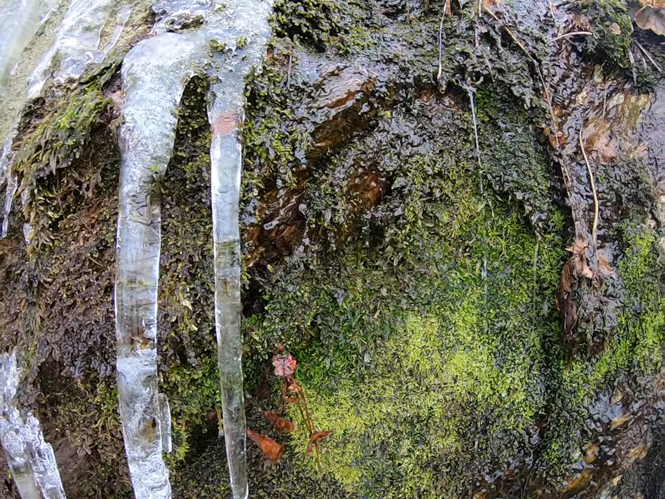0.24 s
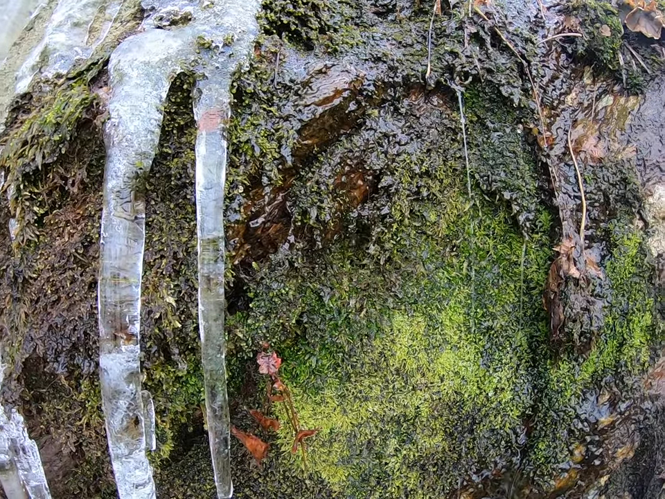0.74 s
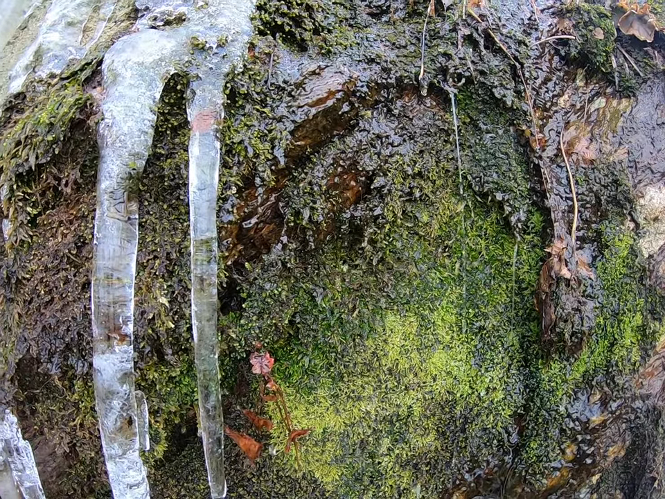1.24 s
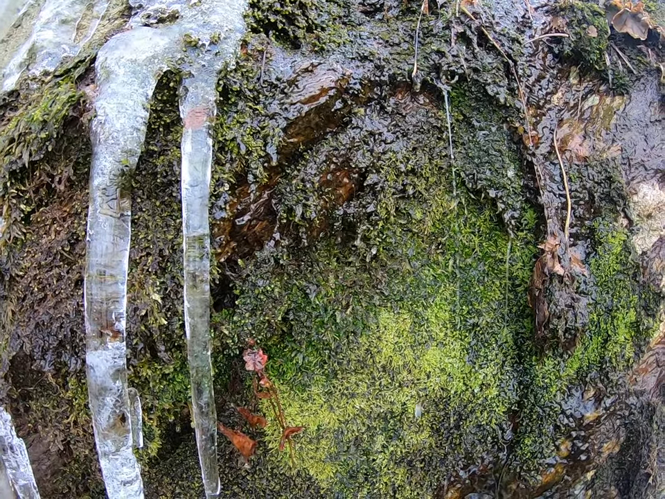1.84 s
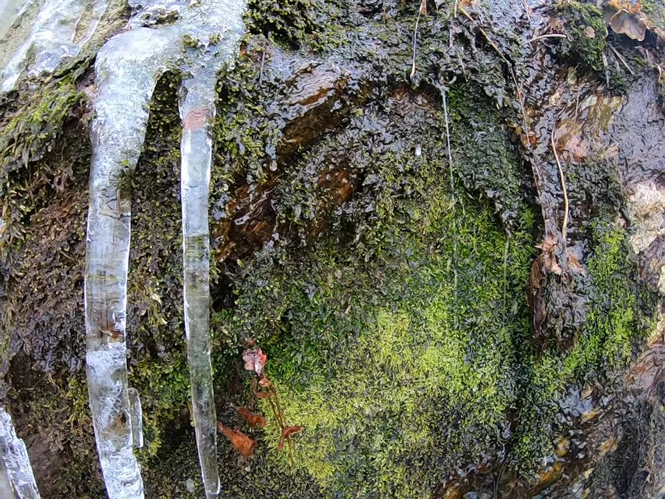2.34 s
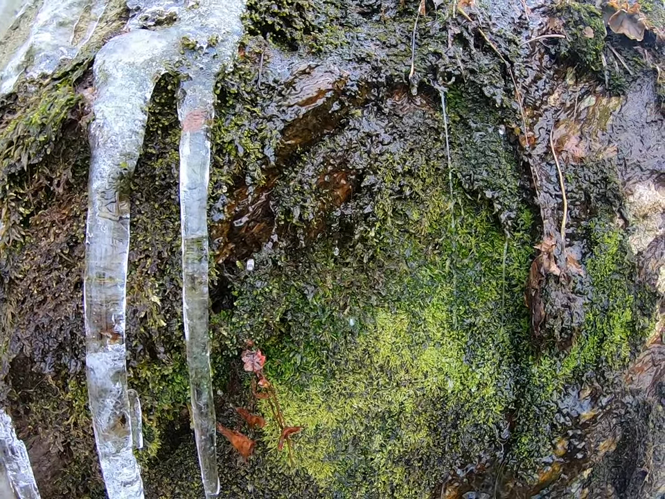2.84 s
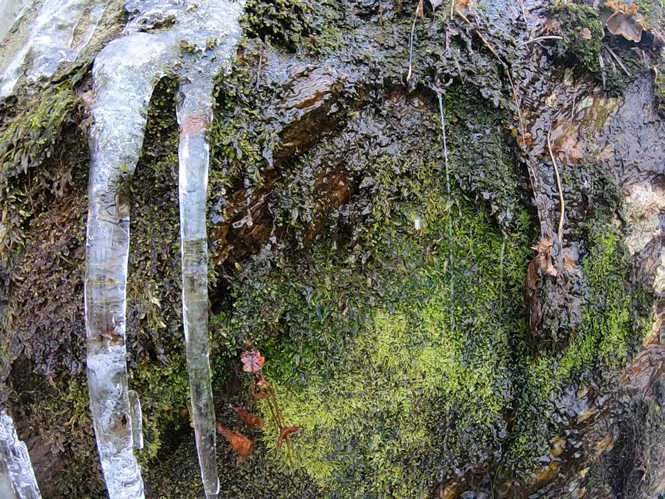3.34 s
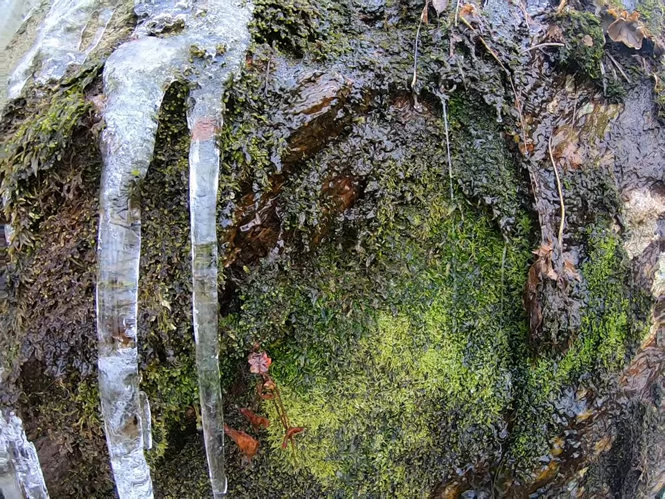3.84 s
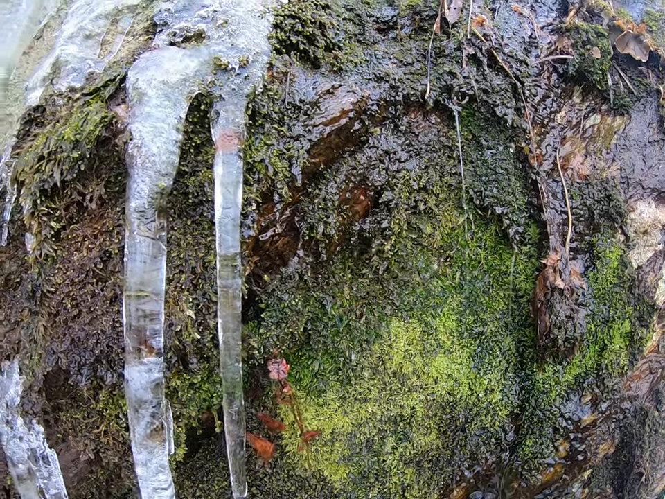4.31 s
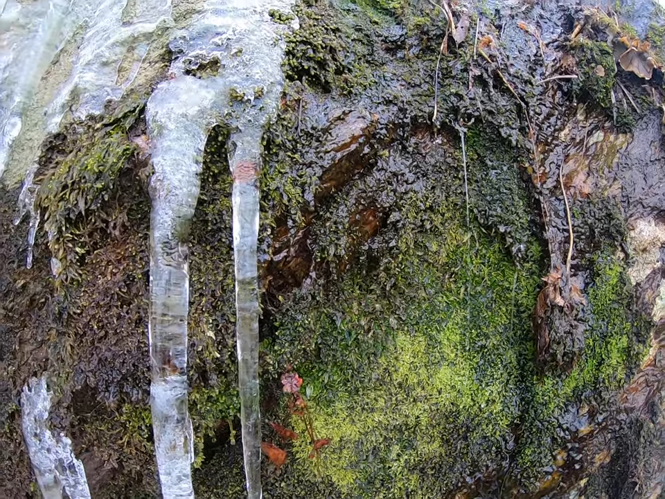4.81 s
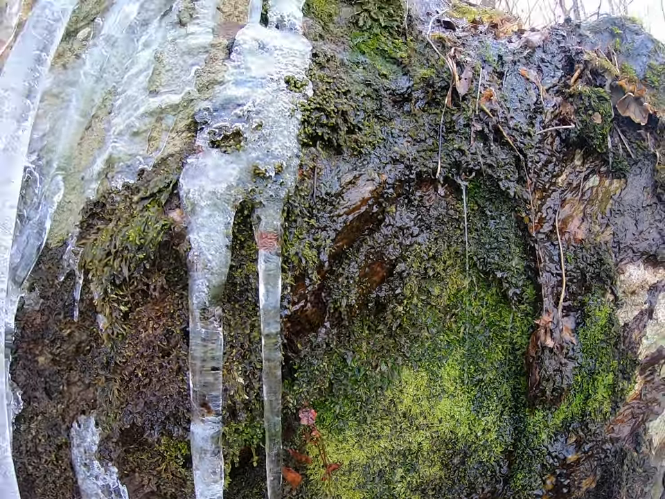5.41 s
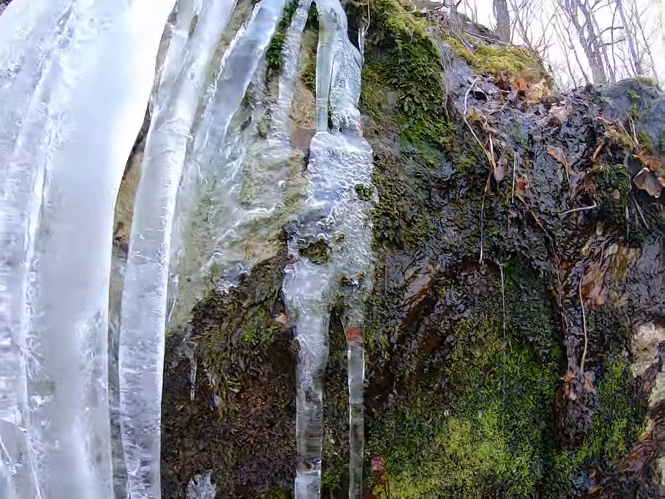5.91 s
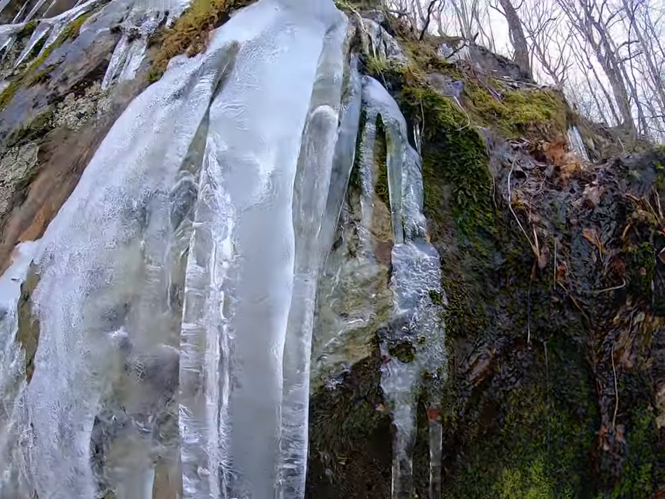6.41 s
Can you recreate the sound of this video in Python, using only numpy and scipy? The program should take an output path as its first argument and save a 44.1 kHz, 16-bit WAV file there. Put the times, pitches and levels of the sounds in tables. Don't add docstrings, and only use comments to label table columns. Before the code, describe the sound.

Meltwater patters in bright, crisp splats on wet rock and moss, with heavy drops plunking hollowly at intervals over a faint low engine hum.

```python
import sys
import numpy as np
from scipy import signal
from scipy.fft import rfft, irfft
from scipy.io import wavfile
from scipy.ndimage import uniform_filter1d

SR = 44100
rng = np.random.default_rng(int(sys.argv[2]) if len(sys.argv) > 2 else 0)


def undo_db(level):
    steps = np.asarray(level, float) / 20
    return 10 ** steps


def unload_audio(sound):
    columns = np.transpose(np.atleast_2d(sound))
    steps = np.round(np.clip(columns, -1, 1) * 32767)
    wavfile.write(sys.argv[1], SR, steps.astype(np.int16))


N = 293441

# start in seconds, peak at the right port in dB, pitch in Hz, left minus right in dB.
SPLATS = [(0.017, -41.6, 7100, -14.0), (0.1114, -41.9, 6900, -19.0), (0.1362, -42, 8610.0, -12.0),
          (0.6203, -36.5, 6240, -21.0), (0.7367, -34, 7170.0, -16), (1.0736, -42.5, 7190.0, -19.0),
          (1.08, -34.5, 7300, -13), (1.1304, -42, 6640, -18.0), (1.5465, -41.5, 8300, -14),
          (1.987, -38, 6540, -18.0), (2.0254, -38.7, 7530, -17), (2.3375, -39.5, 7500, -19.0),
          (2.855, -35.5, 6650, -24), (2.8865, -40.5, 8300, -12), (3.2164, -31.5, 6480.0, -24.0),
          (3.367, -38.5, 7900, -14), (3.5703, -35.5, 8000, -18), (3.6304, -36, 8600, -21),
          (3.7732, -36.5, 6350, -6), (3.8458, -43, 6610.0, -17), (3.966, -38.5, 6120.0, -18.0),
          (4.1712, -37.5, 8300, -15), (4.27, -39, 5060, -12), (4.4152, -39.5, 8160, -8),
          (5.0342, -39.5, 7450, -20), (5.0946, -41.5, 7100, -23), (5.175, -35, 8000, -5),
          (5.498, -42.7, 6940, -22), (5.8404, -40.5, 7900, -15.0), (6.0707, -37, 7100, -28)]
# start in seconds, peak in dB, pitch in Hz.
MOSS_SPLATS = [(0.1452, -46, 6050.0), (0.197, -47, 7000), (0.3973, -45, 5700), (0.4397, -41.5, 5570),
               (0.6823, -48.1, 6800), (0.867, -44.5, 6060.0), (1.1454, -39.5, 7200), (1.282, -45, 6630),
               (1.3788, -40.5, 5170), (1.526, -44.5, 7000), (1.749, -46, 7600), (2.0778, -44.4, 6460),
               (2.1444, -45, 4800), (2.1758, -47, 5000), (2.3551, -41.5, 6850), (2.5247, -49, 7200),
               (2.652, -42, 7400), (2.9927, -41.5, 6400), (3.1676, -43, 7000.0), (3.3613, -43, 6850),
               (3.5994, -45, 6700), (4.263, -53, 6680.0), (4.8605, -42, 5900), (4.907, -40.5, 5820),
               (5.2092, -45.5, 4740), (5.3604, -48, 7100), (5.7559, -44, 6800), (6.1849, -45.5, 6590.0),
               (6.3133, -50, 6620.0), (6.4588, -39.5, 6900)]
# start in seconds, peak in dB, pitch in Hz.
ICE_SPLATS = [(0.0747, -43.5, 8270.0), (0.119, -45.2, 7300.0), (0.1275, -53, 8150), (0.217, -46, 8630.0),
              (0.2536, -41.5, 7200), (0.485, -41, 7500), (0.536, -48, 8700), (1.24, -43.5, 7160.0),
              (1.3442, -42.5, 8350), (1.5799, -47.5, 7450.0), (1.7179, -38.5, 8170.0), (1.873, -45.5, 7660),
              (2.5727, -44.1, 7350), (2.6794, -45, 8300), (2.9747, -40.5, 9200), (3.0154, -42, 7480.0),
              (3.206, -45, 7840), (3.29, -44, 8400), (3.9236, -44.5, 7900), (4.2444, -48, 7370.0),
              (4.9732, -40.5, 8800), (5.315, -45.5, 7990.0), (5.3493, -44, 7750.0), (5.5235, -41.5, 7350.0),
              (5.8253, -48, 7700), (5.858, -44.5, 7710.0), (5.8824, -47.5, 7700), (6.121, -45.5, 8300),
              (6.174, -42, 7500), (6.5879, -43.5, 7300.0)]
# start in seconds, peak in dB.
SPECKS = [(0.2353, -53), (0.4558, -58), (0.8608, -47), (0.9891, -46.5), (1.6216, -50), (2.3729, -48.3),
          (2.5959, -48), (2.8698, -61), (3.0858, -44), (3.1177, -56), (3.1481, -51), (3.1871, -50),
          (3.4559, -46), (3.5158, -46.5), (3.6859, -52), (3.7583, -54), (4.1559, -45), (4.2382, -46),
          (4.3704, -42), (4.3773, -47.5), (4.4956, -46), (4.5559, -47), (4.6802, -46.5), (4.9495, -48),
          (4.993, -52), (5.2354, -48), (5.5307, -52), (5.5796, -45), (6.1623, -51), (6.4841, -47)]
# first drip in seconds, period in seconds, slowing in seconds per second squared, last drip in seconds.
TIPS = [
    (.0395, .16822, .00046, 6.63),
    (.0016, .50332, .00032, 6.63),
    (.3860, .6343, -.00073, 5.9),
]
# peak in dB, growth in dB per second, pitch in Hz.
TIP_VOICES = [
    (-47, 0.64, 7100),
    (-46, -1, 6450),
    (-42, -3.6, 7250),
]
# peak in dB, first ring in Hz, second ring in Hz, first
# ring over peak in dB, second ring over peak in dB.
DROPS = [
    (-36, 1120, 680, 11, 1.5),
    (-26, 1040, 1400, 4.5, -18),
    (-29, 1110, 1620, -4, -1),
    (-25, 1105, 1630, -1, -0.5),
    (-25.5, 1110, 1380, -9.5, -5),
    (-28, 1090, 780, 3.5, -10),
    (-25, 1030, 1450, -5, -6.5),
]
# start in seconds, peak in dB, centre in Hz, left minus right in dB.
PLOPS = [(0.6212, -50, 3550, -1), (1.117, -51, 4300, -8), (1.1304, -48, 4700, -13), (4.294, -52, 4040, -8),
         (2.5247, -54.5, 3400, -4.0), (2.8555, -47, 3550, -5), (2.995, -49.5, 3700, -3),
         (4.5902, -49.5, 2800, -3), (5.0966, -45.5, 3800, -7), (5.7158, -46.5, 3430, -8),
         (6.1203, -53, 3700, 3.0), (6.1714, -52.5, 3680, -7)]
# start in seconds, peak in dB, centre in Hz, left minus right in dB.
AFTER_DROPS = [
    (2.98, -54, 1150, -1.0),
    (3.718, -54, 920, -2.5),
]
# centre in Hz, width in Hz, lift in dB.
PORTS = [
    (9600, 1800, 8),
    (7230, 4400, 7),
]
# multiple of the firing cycle, level in dB.
ENGINE_ORDERS = [(5, -65.3), (6, -62.0), (7, -64.9), (8, -48.6), (9, -71.2), (10, -61.3), (11, -49.5),
                 (12, -59.9), (13, -37.8), (14, -63.2), (15, -48.5), (16, -49.5), (17, -54.3), (18, -65.3),
                 (19, -57.6), (20, -72.5), (21, -55.9), (22, -70.9), (23, -71.3), (24, -70.6), (25, -69.5),
                 (27, -72.5), (29, -72.1), (31, -69.7)]
# centre in seconds, lift over the breeze in dB.
PUFFS = [
    (0.0, 8),
    (.13, 0),
    (.37, 3),
    (6.0, 6),
    (6.2, 3),
    (6.39, 2),
]
# frequency in Hz, left level in dB per Hz, right level in dB per Hz.
AIR = [(24.2, -104, -65), (44, -80.5, -70.5), (102.2, -66, -60), (215.4, -78.5, -78), (292, -96.5, -97),
       (466, -94, -99), (753, -86.5, -88.5), (965, -94.5, -93.5), (2050, -99.3, -99.1),
       (4520, -105.1, -106.8), (7300, -108.3, -107.5), (7900, -110.0, -107.9), (10300, -121.2, -116.0),
       (15700, -145, -133)]
# frequency in Hz, left-right correlation.
LIKENESS = [(40, 0.04), (130, 0.97), (290, -0.34), (640, -0.9), (1410, -0.41), (4000, 0.15)]


def patter():
    s, db, hz, left_db = drips()
    right = splash(s, db, hz, count=7, spread_s=0.0025, fade_db=9.5, scatter=0.23)
    left = splash(s + 0.00093, db + left_db, 1.04 * hz, count=10, spread_s=0.00043, fade_db=2, scatter=0.24)

    spray = bursts(s, db - 8.5, decay_s=0.0064, size=300) * undo_db([[-14], [0]])
    spray = band_twice(spray, 7200, 3500)

    splat_crack_db = 0.6 * db - 40 + 18 * rng.random(len(s))
    crack_db = np.r_[splat_crack_db, -61 + 12 * rng.random(400)]
    crack_s = np.r_[s, rng.random(400) * N / SR]
    turn_away_db_per_s = -1
    crack = bursts(crack_s, crack_db + turn_away_db_per_s * crack_s, decay_s=0.0014, size=110)
    crack = band_twice(crack, 12400, 4700) * undo_db([[-13], [0]])

    chance = rng.random((2500, 3)).T
    far_db = -66 + 8.2 * chance[1]
    far_hz = 6100 * 1.46 ** chance[2]
    far = splash(chance[0] * N / SR, far_db, far_hz, count=2, spread_s=0.0014, fade_db=2, scatter=0.12)

    tick = bursts(s, db - 10, decay_s=0.00038, size=9)
    tick = band(tick, 5000, 13000) * undo_db([[-12], [0]])
    return np.array([left, right + far]) + spray + crack + tick


def drips():
    stray_hz = 7300
    speck_hz = stray_hz * (1 + 0.06 * rng.standard_normal(len(SPECKS)))
    rows = [np.array(SPLATS)[:, :3], np.array(MOSS_SPLATS), np.array(ICE_SPLATS), np.c_[SPECKS, speck_hz]]

    for (first_s, period_s, slowing, last_s), (db, growth_db, hz) in zip(TIPS, TIP_VOICES):
        beat = np.arange(0, last_s - first_s, period_s)
        chance = rng.standard_normal((len(beat), 2)).T
        tip_s = first_s + beat + slowing * beat ** 2
        tip_db = db + growth_db * beat + 3.34 * chance[0]
        rows.append(np.c_[tip_s, tip_db, hz * (1 + 0.053 * chance[1])])
    s, db, hz = np.vstack(rows).T

    strays_per_s, stray_db, stray_wait_s = 14, -50.5, 0.036
    count = int(strays_per_s * N / SR)
    chance = rng.standard_normal((count, 2)).T
    where = rng.random((count, 2)).T
    parent_s = s[(where[0] * len(s)).astype(int)]
    stray_s = parent_s + 0.0074 - stray_wait_s * np.log(1 - where[1])
    s = np.r_[s, np.minimum(stray_s, N / SR - 0.01)]
    db = np.r_[db, stray_db + chance[0]]
    hz = np.r_[hz, stray_hz * (1 + 0.08 * chance[1])]

    shadow_db = -12.5
    left_db = np.r_[np.array(SPLATS)[:, 3], np.full(len(s) - len(SPLATS), shadow_db)]
    return s, db + 1.1, 0.943 * hz, left_db


def splash(s, db, hz, count, spread_s, fade_db, scatter):
    chance = rng.random((len(s), count, 4))
    later = np.arange(count) > 0
    wait = -np.log(1 - chance[..., 0]) * later
    gain = undo_db(db[:, None] - fade_db * wait - (1 + 5 * chance[..., 1]) * later)
    pitch = hz[:, None] * np.exp(scatter * (2 * chance[..., 2] - 1) * later)
    cycles = np.where(later, 0.96 + 6.7 * chance[..., 3], 2.2 + 3.4 * chance[..., 3])
    start_s = s[:, None] + spread_s * wait
    return bubbles(start_s.ravel(), pitch.ravel(), cycles.ravel(), gain.ravel(), glide=0.079)


def bubbles(s, hz, cycles, gain, glide):
    length = 640
    t = np.arange(length)[None] / SR
    turns = t * hz[:, None] / cycles[:, None]
    shape = (1 - np.exp(-turns / 0.11)) * np.exp(-turns)
    rise = 1 + glide * turns / (1 + turns)
    wave = gain[:, None] * shape * np.sin(2 * np.pi * hz[:, None] * t * rise)
    at = (s * SR).astype(int)[:, None] + np.arange(length)
    return np.bincount(at.ravel(), wave.ravel(), N + SR)[:N]


def bursts(s, db, decay_s, size):
    hits = np.bincount((s * SR).astype(int), undo_db(db), N)
    shape = signal.lfilter([1], [1, -np.exp(-1 / (decay_s * SR))], hits)
    return uniform_filter1d(shape, size=size) * rng.standard_normal((2, N))


def drops():
    first_s, period_s = 1.3784, 0.7662
    out = np.zeros((2, N))
    t = np.arange(2600) / SR - 0.002
    turn = np.array([[2.1], [0]])
    shadow = undo_db([[-5], [0]])
    detune = np.array([[1.03], [1]])

    slap = np.exp(-(t / 0.00074) ** 2) * np.cos(2 * np.pi * 1800 * t + turn)
    swell = np.clip(1 + t / 0.0018, 0, 1)
    fill = np.clip(0.5 + t / 0.0012 / 2, 0, 1)
    ring = fill * np.exp(-np.abs(t / 0.0044) ** 3)
    tail = undo_db(-2) * np.exp(-t / 0.012)

    for k, (db, first_hz, second_hz, first_db, second_db) in enumerate(DROPS):
        modes = [(480, first_db / 2 - 21), (730, first_db / 2 - 14), (first_hz, first_db), (second_hz, second_db),
                 (1850, -7), (2280, -14)]
        rings = sum(undo_db(ring_db) * np.cos(2 * np.pi * hz * detune * t + turn) for hz, ring_db in modes)
        wet = band_twice(rng.standard_normal((2, len(t))), second_hz, 1500)
        sound = undo_db(-13.5) * slap + swell * (ring * rings + tail * wet)
        at = int((first_s + k * period_s - 0.0018) * SR)
        out[:, at:at + len(t)] += undo_db(db - 4.5) * shadow * sound
    return out


def taps():
    s, db, hz, pan_db = np.vstack([PLOPS, AFTER_DROPS]).T
    plops = []
    for side in (1, -1):
        port_db = db + side * pan_db / 2 + 1.5
        plops.append(splash(s, port_db, 0.977 * hz, count=4, spread_s=0.0022, fade_db=2, scatter=0.27))
    puddles = len(PLOPS)
    contact = bursts(s[:puddles], db[:puddles] + 3, decay_s=0.00065, size=12)

    pat_first_s, pat_period_s, pat_db = 0.2375, 0.7806, -60
    pat_s = np.arange(pat_first_s, N / SR, pat_period_s)
    pats = bursts(pat_s, np.full(len(pat_s), pat_db + 16.5), decay_s=0.0054, size=66)
    return np.array(plops) + band(contact, 5000, 3000) + band_twice(pats, 1500, 3600)


def bump():
    t = np.arange(N) / SR - 0.345
    knock = np.exp(-(t / 0.0022) ** 2) * np.sin(2 * np.pi * 230 * t)
    return undo_db(-47) * knock * undo_db([[0], [-6]])


def engine():
    cycle_hz = 6.659
    spread = 0.285
    turn = 2 * np.pi * cycle_hz * np.arange(N) / SR + 0.13 * walk(0.836)
    hum = 0
    for k, db in ENGINE_ORDERS:
        waver = undo_db(db + 0.78 * walk(4.08))
        hum = hum + waver * np.sqrt(2) * np.sin(k * turn + spread * k ** 2)
    return hum * undo_db([[-5.7], [0]])


def wind():
    breeze_db, freshen_s, freshen_db_per_s, puff_s = -69, 5.5, 4.5, 0.022
    t = np.arange(N) / SR
    db = breeze_db + freshen_db_per_s * np.maximum(t - freshen_s, 0)
    db = db + sum(lift_db * np.exp(-((t - s) / puff_s) ** 2) for s, lift_db in PUFFS)
    ports = []
    for _ in range(2):
        rumble = band(band(rng.standard_normal(N), 258, 227), 283, 220)
        ports.append(rumble * undo_db(db + 3 * walk(25)))
    return np.array(ports) * undo_db([[21], [16]])


def air():
    hz = np.log(np.fft.rfftfreq(N, 1 / SR) + 1)
    table, like = np.array(AIR), np.array(LIKENESS)
    share = np.clip(np.interp(hz, np.log(like[:, 0]), like[:, 1]), -1, 1)
    waver = undo_db(0.6 * np.array([walk(4.77), walk(3.81)]))
    first, other = rfft(rng.standard_normal((2, N)) * waver)
    pair = np.array([first, share * first + np.sqrt(1 - share ** 2) * other])
    colour = [undo_db(np.interp(hz, np.log(table[:, 0]), table[:, k])) * np.sqrt(SR / 2) for k in (1, 2)]
    return irfft(pair * colour, N)


def band(x, hz, width):
    return signal.lfilter(*signal.iirpeak(hz, hz / width, fs=SR), x)


def band_twice(x, hz, width):
    return band(band(x, hz, width), hz, width)


def walk(rate):
    k = int(SR / rate)
    steps = np.repeat(rng.standard_normal(N // k + 1), k)
    return 1.3 * uniform_filter1d(uniform_filter1d(steps, k), k)[:N]


def scene():
    wet = [x + undo_db(db) * band(x, hz, width) for x, (hz, width, db) in zip(patter(), PORTS)]
    return undo_db(-5) * np.array(wet) + drops() + taps() + bump() + engine() + wind() + air()


def top_cut(x):
    return signal.sosfilt(signal.butter(12, 16360, fs=SR, output="sos"), x)


def record(dry):
    low_pass = signal.ellip(10, 0.2, 60, 15800, fs=SR, output="sos")
    mix = signal.sosfilt(low_pass, dry)
    return top_cut(mix)


dry = scene()
out = record(dry)
unload_audio(out)
```